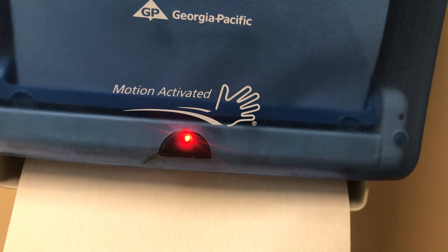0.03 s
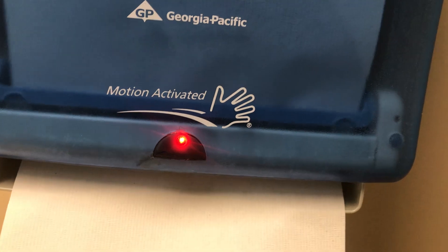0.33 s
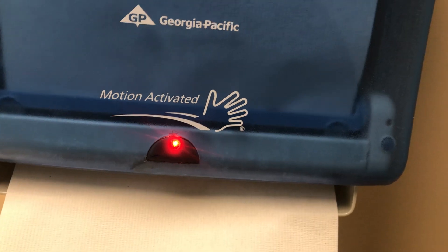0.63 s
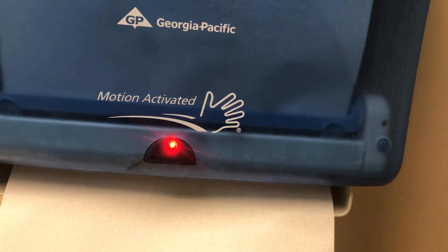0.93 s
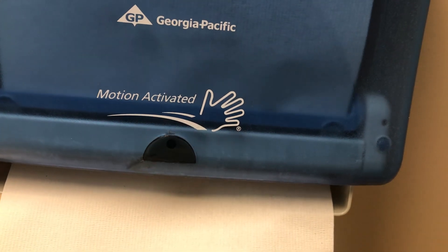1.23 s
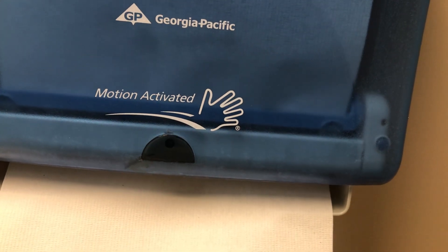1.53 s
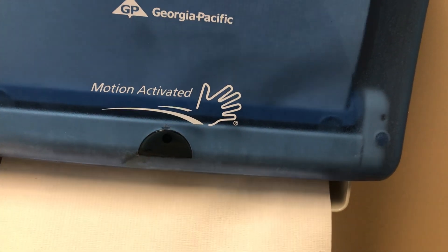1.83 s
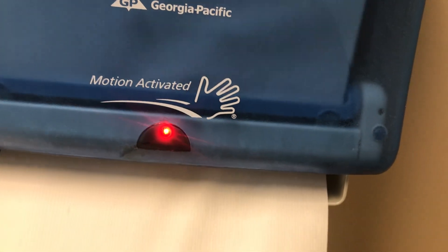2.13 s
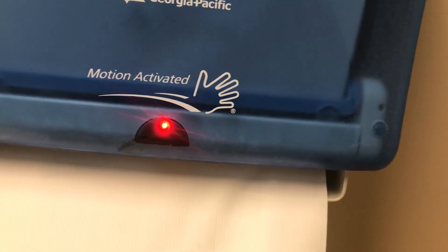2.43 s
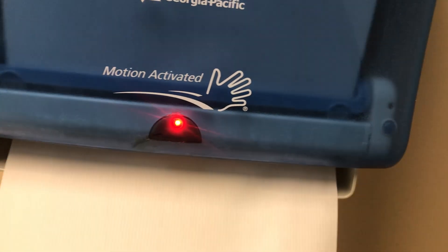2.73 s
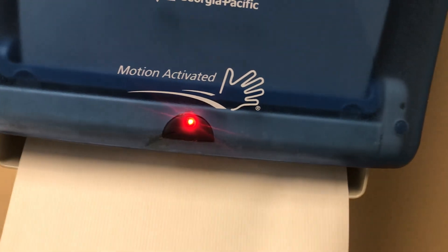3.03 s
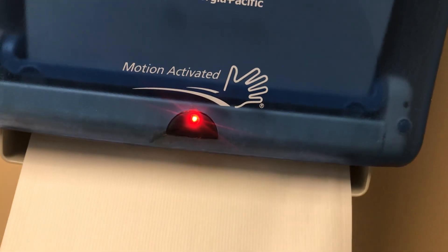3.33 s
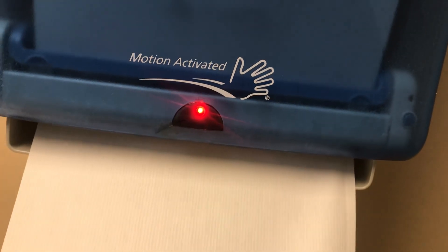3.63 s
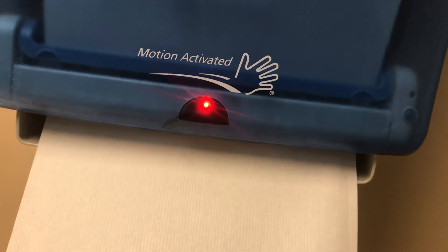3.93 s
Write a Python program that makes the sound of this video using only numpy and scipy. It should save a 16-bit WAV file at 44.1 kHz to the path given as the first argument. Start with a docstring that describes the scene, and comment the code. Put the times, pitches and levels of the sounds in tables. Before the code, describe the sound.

A paper towel dispenser whirs and rattles out a sheet after a few plastic clicks.

```python
"""A motorised paper towel dispenser, close up in a small hard room with humming ventilation.
First its plastic housing clacks and settles, and the hanging sheet stirs with a soft friction noise.
A faint hiss passes, and a click comes before the feed. The motor then spins up and hums at
harmonics of its shaft rate; gear teeth rattle the resonant housing while paper slides over the
roller. At last the drive coasts down."""
import sys
import numpy as np
from scipy import signal
from scipy.fft import rfft, irfft
from scipy.io import wavfile
from scipy.ndimage import uniform_filter1d

SR = 44100
rng = np.random.default_rng(int(sys.argv[2]) if len(sys.argv) > 2 else 0)


def master(y):
    """Save y as 16-bit WAV."""
    cut = np.clip(np.atleast_2d(y).T, -1, 1)
    pcm = np.round(cut * 32767)  # scale
    wavfile.write(sys.argv[1], SR, pcm.astype(np.int16))


N = 176400
T = np.arange(N) / SR
SWITCH_ON_S, SWITCH_RISE_S = 1.87, 0.057
# load on the drive: t/s, gear rattle level/dB, paper slide level/dB
DRIVE_LOAD = [(1.9, -58, -59), (1.945, -40, -69), (1.968, -34, -37.5), (2.04, -30, -33), (2.12, -31, -32.5),
              (2.19, -31, -35), (2.25, -35, -34), (2.75, -36, -34), (3.3, -37.5, -34.5), (3.64, -38.5, -34),
              (3.69, -33.5, -35), (3.84, -34, -39.5), (3.89, -36, -57), (4.0, -42, -69)]


def amp(db):
    """The decibel scale: level to amplitude ratio."""
    return 10 ** (np.asarray(db) / 20)


def unit(x):
    """Normalisation to rms 1."""
    return x / np.sqrt(np.mean(x ** 2))


def curve(table, column=1):
    """Linear interpolation of one column of a time table at every sample."""
    rows = np.array(table)
    return np.interp(T, rows[:, 0], rows[:, column])


def walk(rate):
    """Random modulation: smoothed steps, `rate` per second, with a spread near 1."""
    hold = int(SR / rate)
    steps = np.repeat(rng.standard_normal(N // hold + 1), hold)
    return 1.27 * uniform_filter1d(uniform_filter1d(steps, hold), hold)[:N]


def colour(x, spectrum, size=4096):
    """Minimum-phase filtering through (f/Hz, level/dB) points, keeping the power of white noise."""
    hz, db = np.array(spectrum).T
    f = np.maximum(np.arange(size // 2 + 1) * SR / size, 1)
    cepstrum = irfft(np.log(amp(np.interp(np.log(f), np.log(hz), db))))
    cepstrum[1:size // 2] *= 2  # folding the cepstrum makes the filter causal
    cepstrum[size // 2 + 1:] = 0
    response = irfft(np.exp(rfft(cepstrum)))
    return signal.fftconvolve(x, response / np.linalg.norm(response))[:N]


def ring(x, hz, width_hz):
    """A damped resonator with gain 1 at its centre."""
    return signal.lfilter(*signal.iirpeak(hz, hz / width_hz, fs=SR), x)


def lowpass(x, hz, order=2):
    """Gentle attenuation above a cutoff frequency."""
    return signal.sosfilt(signal.butter(order, min(hz, SR / 2 - 1000), fs=SR, output="sos"), x)


def crackle(rate, scatter_db):
    """Stick-slip friction: tiny random slips of unequal size, `rate` per second."""
    slips = (rng.random(N) < rate / SR) * rng.standard_normal(N)
    return unit(slips * amp(scatter_db * np.minimum(rng.exponential(size=N), 4)))


def housing(x, ring_db):
    """Modal resonance: the plastic shell adds its modes to the sound that excites it."""
    # shell modes: f/Hz, bandwidth/Hz, relative level/dB
    modes = [(664, 24, -4), (855, 44, 7.5), (1138, 30, -3.5), (1476, 51, -6), (1935, 40, 0),
             (2390, 60, -4.5), (2804, 82, -6), (3456, 58, -6), (4073, 79, 0.5), (5300, 130, -1.5),
             (6130, 130, -5), (6930, 48, 2.5), (9030, 210, -2), (14300, 90, 0)]
    return x + amp(ring_db) * sum(amp(db) * ring(x, hz, width) for hz, width, db in modes)


def room(x, wet_db, t60_s=0.51, treble_t60_s=0.42, split_hz=4000, build_s=0.0089):
    """Reverberation: close hard walls return a dense tail whose treble dies first."""
    t, noise = T[:SR], rng.standard_normal(SR)
    low = lowpass(noise, split_hz, order=1)
    tail = low * amp(-60 * t / t60_s) + (noise - low) * amp(-60 * t / treble_t60_s)
    tail *= np.minimum(t / build_s, 1) ** 2
    return x + amp(wet_db) * signal.fftconvolve(x, tail / np.linalg.norm(tail))[:N]


def background(whine_hz=8100):
    """Tones over noise: wavering ventilation hum, air rumble, and a separate faint electronic whine."""
    # ventilation tones: f/Hz, level/dB
    hum_tones = [(65, -59), (136, -59), (255, -59), (294, -60)]
    # air noise spectrum: f/Hz, relative level/dB
    air_spectrum = [(25, -14), (45, -3), (70, 6.5), (110, -5), (145, 3.5), (190, -0.5), (290, -1.5),
                    (335, -4), (400, -22), (900, -23.5), (1500, -19.5), (2100, -30), (3200, -28.5),
                    (6000, -34.5), (10000, -41.5), (15500, -42)]
    hum = sum(amp(db + 2.4 * walk(5.88)) * np.sin(2 * np.pi * hz * T + 1.04 * walk(8))
              for hz, db in hum_tones)
    whine = amp(-82) * np.sin(2 * np.pi * whine_hz * T)
    rumble = amp(-51.5) * unit(colour(rng.standard_normal(N), air_spectrum))
    return np.sqrt(2) * (hum + whine) + rumble


def sheet_rustle():
    """Friction noise: fibres slip as the hanging sheet stirs, each stir with its own resonance."""
    # stirs: peak t/s, level/dB, rise/s, fall/s, resonance f/Hz, cutoff f/Hz
    stirs = [(.025, -37.5, 0.031, 0.039, 2660, 9000), (.21, -47.5, .02, 0.054, 1690, 12800),
             (.45, -59.5, 0.011, 0.033, 1650, 7040), (.645, -54.5, 0.067, 0.073, 2550, 8000),
             (1.02, -61, 0.029, 0.073, 1700, 11000), (1.125, -63, .05, 0.027, 2600, 12000),
             (1.26, -63, 0.028, .05, 1650, 11000), (1.52, -61, 0.053, 0.039, 1550, 4500),
             (1.65, -60.5, 0.017, 0.045, 1500, 5000), (1.774, -41, 0.032, 0.032, 1310, 9000),
             (1.93, -50, 0.038, 0.026, 3000, 9000)]
    # rustle spectrum: f/Hz, relative level/dB
    rustle_spectrum = [(260, -20), (450, -7), (1000, -3), (1600, -5.5), (2000, -7.5), (2600, -6),
                       (5000, -10.5), (10000, -15), (15500, -6)]
    fibres = colour(crackle(rate=7000, scatter_db=1.5), rustle_spectrum)
    rustle = np.zeros(N)
    for peak, db, rise, fall, hz, cutoff_hz in stirs:
        envelope = amp(db) * np.exp(-np.maximum((peak - T) / rise, (T - peak) / fall))
        rustle += envelope * unit(lowpass(fibres + ring(fibres, hz, width_hz=560), cutoff_hz))
    return room(rustle, wet_db=-5)


def plastic_clicks(box_hz=159, box_width_hz=210, thump_rise_s=0.0052, thump_decay_s=0.073):
    """Impact excitation: struck plastic cracks at the pitch of the part, and the box thumps."""
    # impacts: t/s, level/dB, cutoff f/Hz, attack/s, decay/s, thump level/dB, part f/Hz
    impacts = [(0.0304, -20, 16000, 0.0015, 0.0056, -36.5, 3380),
               (.04, -26.5, 5500, 0.0011, 0.0049, -44.5, 1590),
               (0.1758, -37.5, 17000, 0.00048, 0.0082, -55, 8300),
               (0.199, -44, 4000, 0.0022, 0.0058, -63, 1800), (.227, -35, 2130, 0.0049, 0.023, -47, 1440),
               (1.774, -40, 15000, .0006, 0.0033, -71, 4100),
               (1.7851, -28, 14200, 0.00086, 0.0048, -41, 4300),
               (1.793, -36.5, 1480, 0.0023, .012, -55, 950)]
    # impact spectrum: f/Hz, relative level/dB
    clack_spectrum = [(90, -10), (150, -7), (500, -7.5), (1400, -4), (2500, -3.5), (3400, -1), (4500, -7.5),
                      (5300, -5.5), (7500, -8.5), (11000, -14.5), (15500, -17)]
    cracks, thumps = np.zeros(N), np.zeros(N)
    for start, db, cutoff_hz, attack, decay, thump_db, part_hz in impacts:
        age = np.maximum(T - start, 0)
        envelope = np.minimum(age / attack, 1) * np.exp(-np.maximum(age - 2 * attack, 0) / decay)
        crack = lowpass(colour(rng.standard_normal(N), clack_spectrum), cutoff_hz)
        cracks += amp(db) * envelope * unit(crack + amp(0.5) * ring(crack, part_hz, width_hz=560))
        thumps += amp(thump_db) * (1 - np.exp(-age / thump_rise_s)) * np.exp(-age / thump_decay_s)
    box = ring(rng.standard_normal(N), box_hz, box_width_hz)
    box = unit(ring(box, box_hz, box_width_hz))
    return room(housing(cracks, ring_db=-4), wet_db=-7.5) + thumps * box


def hiss(start_s=.77, end_s=.89, ramp_s=0.0053):
    """Gated white noise: a short spell of faint, even hiss."""
    gate = np.clip(np.minimum(T - start_s, end_s - T) / ramp_s, 0, 1)
    return amp(-66) * gate * rng.standard_normal(N)


def motor(turns):
    """Rotational harmonics: three poles hum at three times the shaft rate, amid weaker partials."""
    # strength of the hum: t/s, level/dB
    hum_level = [(2.04, -51), (2.13, -28), (2.22, -33.5), (2.31, -27.5), (2.5, -25), (2.82, -27.5),
                 (3.07, -25), (3.19, -28.5), (3.35, -24), (3.65, -26), (3.71, -35.5), (3.76, -44),
                 (4.0, -65)]
    # partials: multiple of the shaft rate, relative level/dB, waver/dB
    partials = [(1, -27.5, 3), (3, -1.5, 1.1), (4, -22.5, 3.5), (12, -31, 10)]
    hum = np.zeros(N)
    for order, db, waver in partials:
        gain = amp(db + waver * walk(16))
        hum += gain * np.sin(2 * np.pi * order * turns + 0.36 * waver * walk(13))
    return np.sqrt(2) * amp(curve(hum_level)) * hum


def gear_rattle(turns, teeth=12, jitter_s=.00022, scatter_db=2.5, roller_hz=9.8, roller_db=.5):
    """Gear-mesh excitation: each tooth ticks unevenly into the housing, with a scrape between ticks."""
    # rattle spectrum: f/Hz, relative level/dB
    gear_spectrum = [(40, -16), (62, 0.5), (100, -10), (150, -2), (220, -5), (450, -5.5), (850, -8.5),
                     (1300, -7), (1550, -8), (2100, -9), (2800, -9.5), (4100, -13), (7000, -21),
                     (15500, -32.5)]
    mesh_times = T[1:][np.diff(np.floor(turns * teeth)) > 0]
    lateness, force = rng.standard_normal((len(mesh_times), 2)).T
    tick_samples = np.clip((mesh_times + jitter_s * lateness) * SR, 0, N - 1).astype(int)
    ticks = np.zeros(N)
    np.add.at(ticks, tick_samples, amp(scatter_db * np.clip(force, -2, 2)))
    ticks -= uniform_filter1d(ticks, 2001)  # remove the steady part of the force
    contact = unit(ticks) / np.sqrt(2) + amp(-1) * crackle(rate=14000, scatter_db=1)
    rattle = unit(housing(colour(contact, gear_spectrum), ring_db=-9.5))
    ripple_db = roller_db * np.sin(2 * np.pi * roller_hz * (T - SWITCH_ON_S))
    return room(rattle * amp(curve(DRIVE_LOAD) + ripple_db), wet_db=-7.5)


def paper_feed(sizzle_hz=8940, sizzle_width_hz=1600):
    """Sliding friction: paper rubs over the roller and sizzles past the edge of the slot."""
    # sliding paper spectrum: f/Hz, relative level/dB
    paper_spectrum = [(320, -18), (600, -11), (900, -6.5), (1500, -3.5), (2050, -8.5), (2400, -2.5),
                      (4000, -2.5), (4800, -5.5), (5500, -5), (7000, -8.5), (7700, -11.5), (8200, -10),
                      (9500, -11.5), (10500, -18), (12400, -15), (15500, -19)]
    # sizzle of the lengthening sheet: t/s, level/dB
    sizzle_level = [(2.2, -58), (2.7, -50.5), (3.25, -53), (3.55, -46), (3.8, -51), (3.88, -70)]
    slide = colour(crackle(rate=10000, scatter_db=1.64), paper_spectrum)
    slide = unit(housing(slide, ring_db=-4.5))
    sizzle = ring(crackle(rate=6000, scatter_db=2.5), sizzle_hz, sizzle_width_hz)
    sizzle = unit(ring(sizzle, sizzle_hz, sizzle_width_hz))
    slide_db = curve(DRIVE_LOAD, column=2) + .5 * walk(25.2)
    return room(slide * amp(slide_db) + sizzle * amp(curve(sizzle_level)), wet_db=-6.5)


def gear_whir(turns, order=7):
    """A shaft harmonic, roughened by random modulation, rises and falls in pitch with the speed."""
    # whir, strongest as the drive runs up and down: t/s, level/dB
    whir_level = [(1.95, -60), (2.04, -38), (2.13, -51), (2.25, -63), (3.62, -58), (3.7, -40), (3.84, -41),
                  (3.89, -43), (4.0, -57)]
    envelope = amp(curve(whir_level) + 1.7 * walk(60))
    return np.sqrt(2) * envelope * np.sin(2 * np.pi * order * turns + 0.91 * walk(110))


def housing_song(waver_hz=40.34):
    """Resonance: as the load changes, single wavering tones of the shell swell and fade."""
    # swells: peak t/s, f/Hz, level/dB, half length/s
    swells = [(1.975, 1520, -34.5, 0.013), (2.141, 1519, -32.5, 0.016), (2.175, 3070, -41.5, 0.037),
              (2.211, 516, -34.5, 0.023), (2.776, 963, -38.5, 0.011), (3.715, 326, -35, 0.013),
              (3.763, 1490, -42, .03), (3.844, 1462, -42, 0.027), (3.896, 166.6, -39.5, 0.023)]
    song = np.zeros(N)
    for peak, hz, db, half_length in swells:
        envelope = amp(db) * np.exp(-.5 * ((T - peak) / half_length) ** 2)
        song += envelope * np.sin(2 * np.pi * hz * T + 0.91 * walk(waver_hz))
    return np.sqrt(2) * song


def scene():
    """Superposition: all sources add at one point, the same in both channels."""
    # motor speed: t/s, shaft rotation f/Hz
    shaft_speed = [(1.93, 25.2), (1.98, 80), (2.04, 112), (2.12, 126.6), (2.2, 126.6), (2.4, 124.6),
                   (2.66, 126.5), (2.9, 126.6), (3.16, 125.4), (3.36, 125.8), (3.665, 125.3), (3.72, 114),
                   (3.85, 79), (3.93, 47), (4.0, 20.4)]
    turns = np.cumsum(curve(shaft_speed)) / SR
    switched_on = np.clip((T - SWITCH_ON_S) / SWITCH_RISE_S, 0, 1)
    drive = motor(turns) + gear_rattle(turns) + gear_whir(turns) + housing_song() + paper_feed()
    mono = switched_on * drive + plastic_clicks() + sheet_rustle() + background() + hiss()
    return np.array([mono, mono])


def record(dry):
    """Band limiting: the deepest bass is thinned and the top is cut steeply."""
    bass_hz, top_hz = 45, 15700
    thinned = signal.sosfilt(signal.butter(3, bass_hz, "high", fs=SR, output="sos"), dry)
    return signal.sosfilt(signal.ellip(10, .2, 80, top_hz, fs=SR, output="sos"), thinned)


dry = scene()
out = record(dry)
master(out)
```